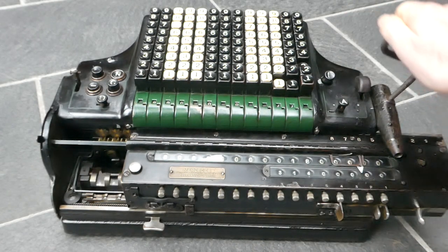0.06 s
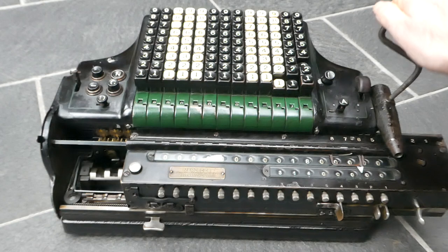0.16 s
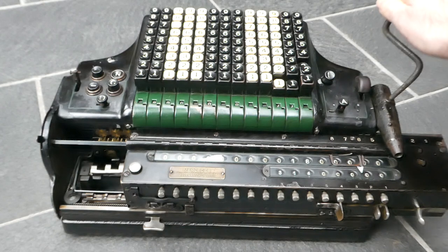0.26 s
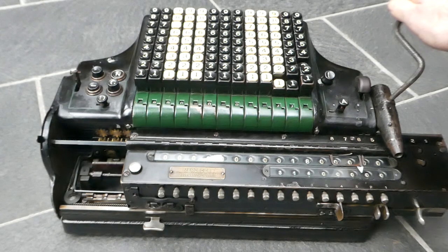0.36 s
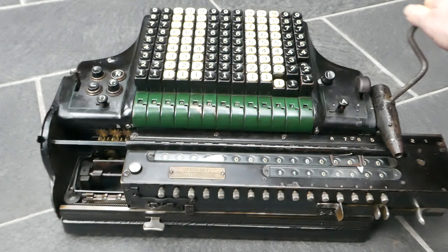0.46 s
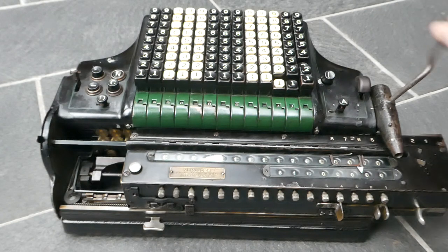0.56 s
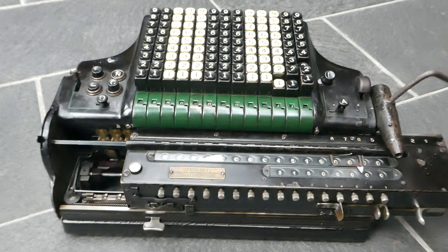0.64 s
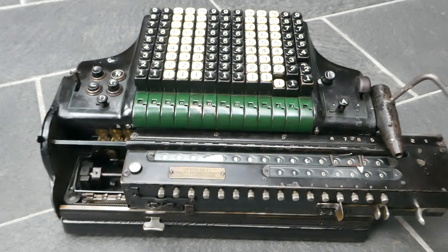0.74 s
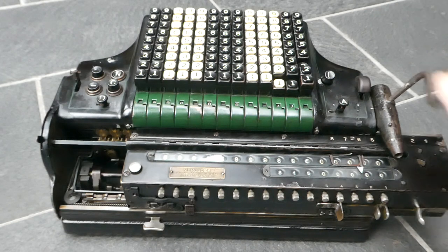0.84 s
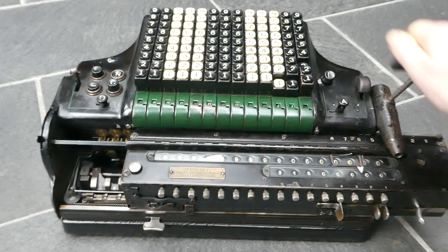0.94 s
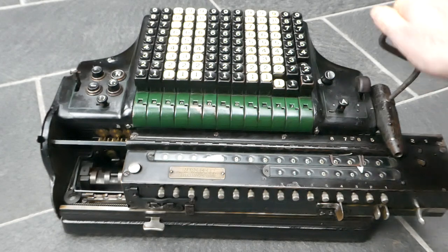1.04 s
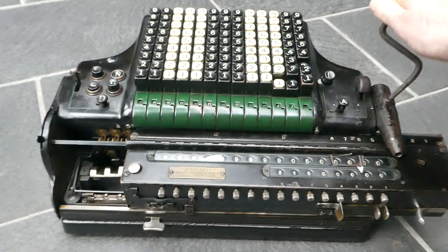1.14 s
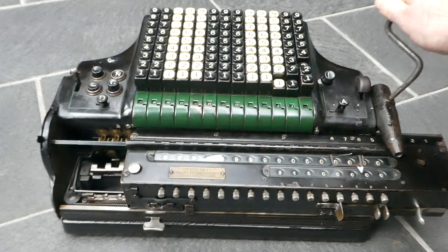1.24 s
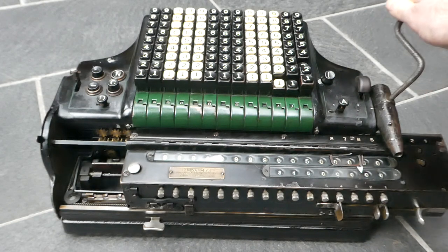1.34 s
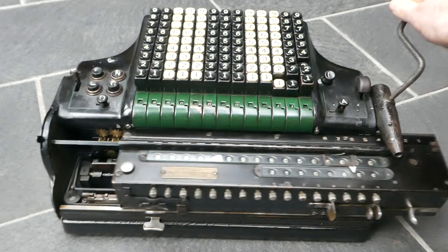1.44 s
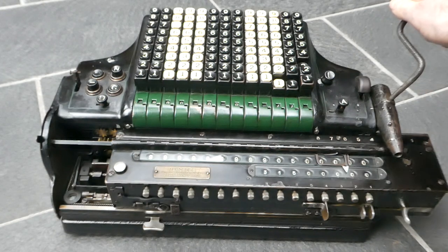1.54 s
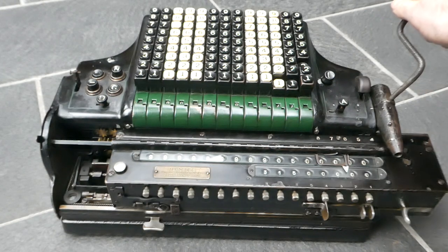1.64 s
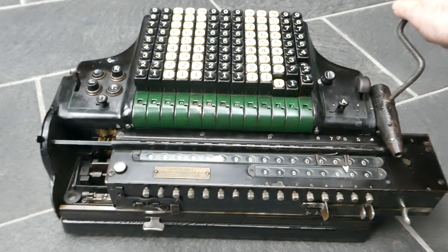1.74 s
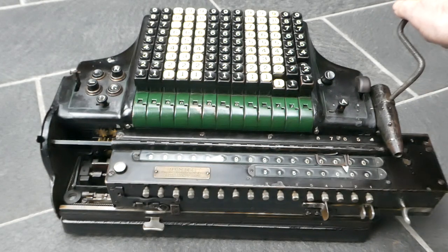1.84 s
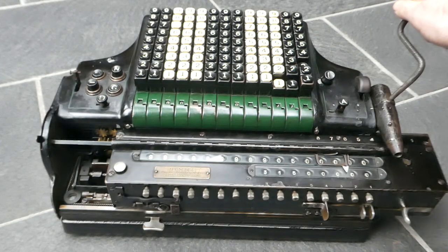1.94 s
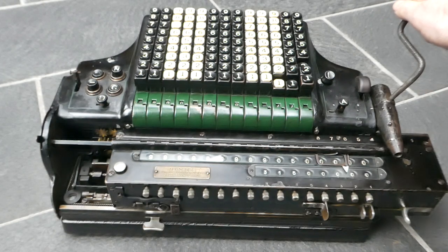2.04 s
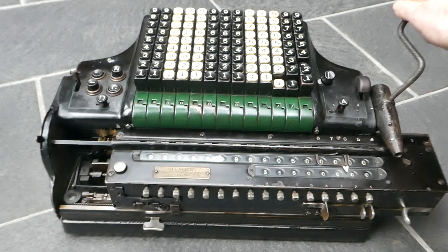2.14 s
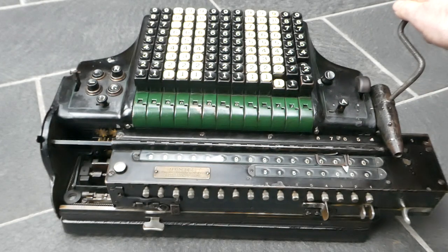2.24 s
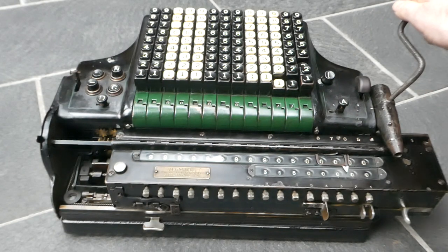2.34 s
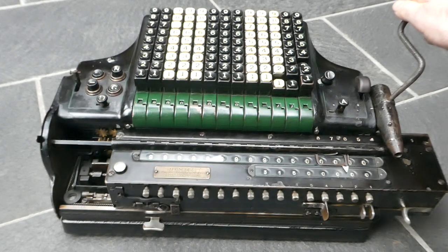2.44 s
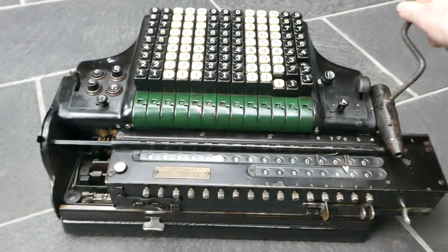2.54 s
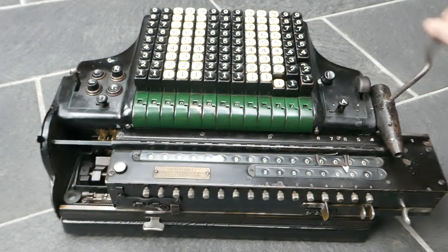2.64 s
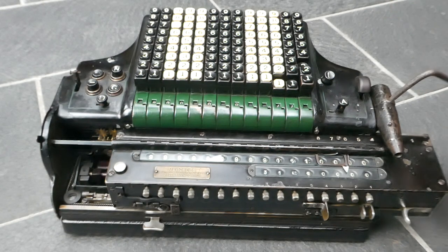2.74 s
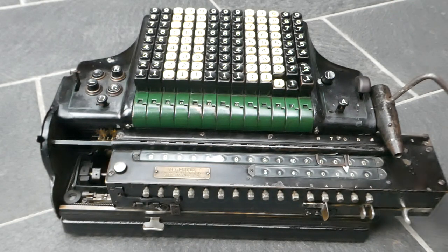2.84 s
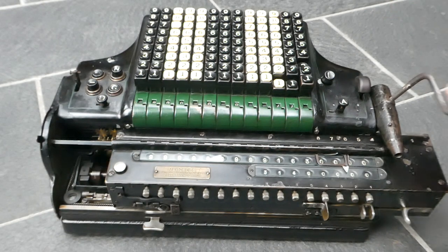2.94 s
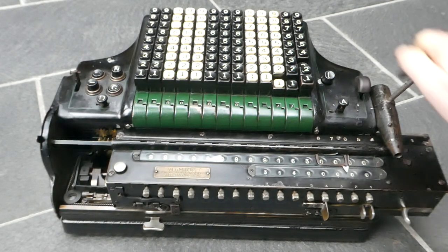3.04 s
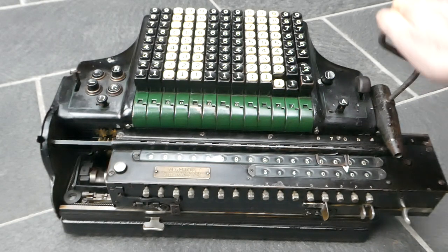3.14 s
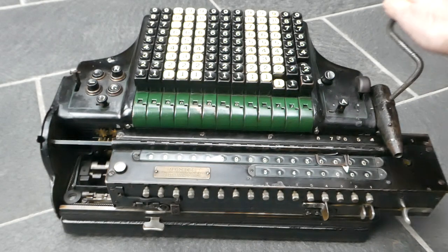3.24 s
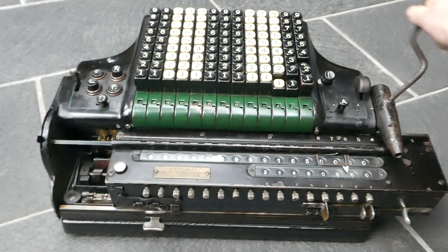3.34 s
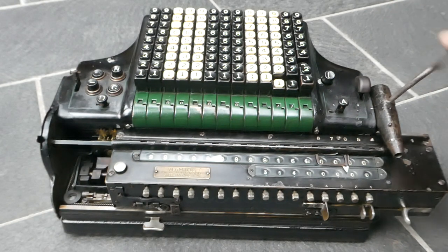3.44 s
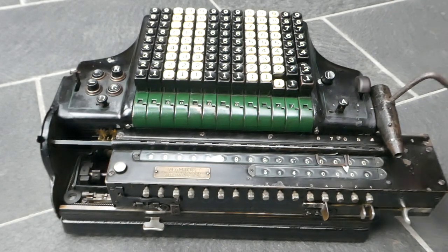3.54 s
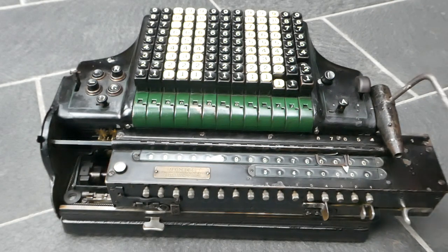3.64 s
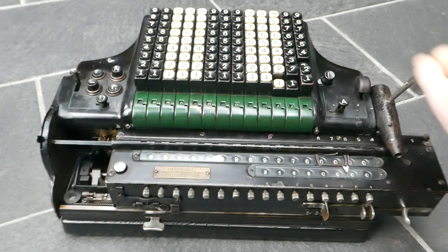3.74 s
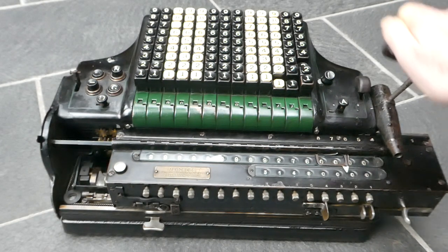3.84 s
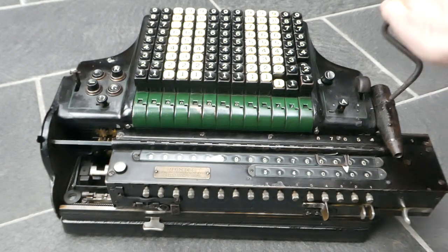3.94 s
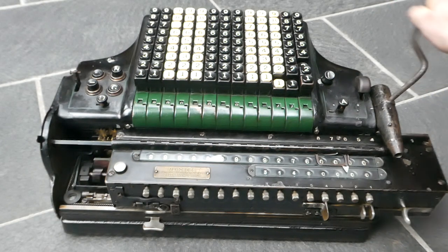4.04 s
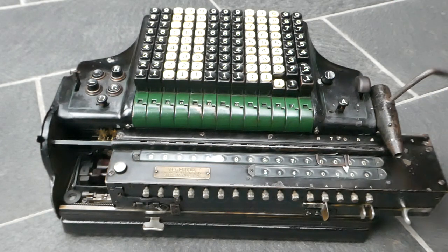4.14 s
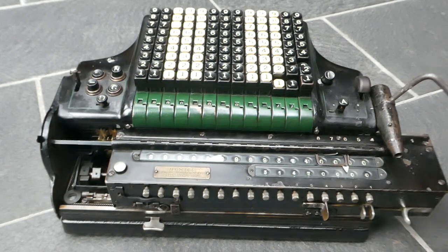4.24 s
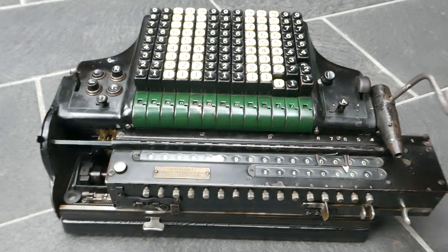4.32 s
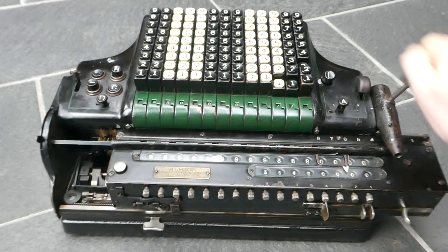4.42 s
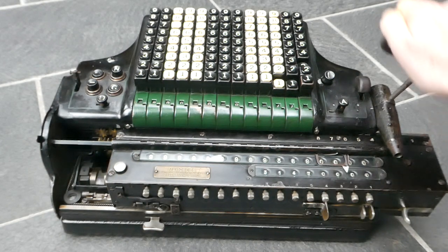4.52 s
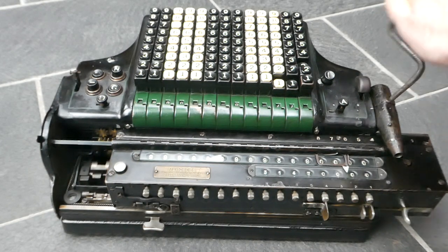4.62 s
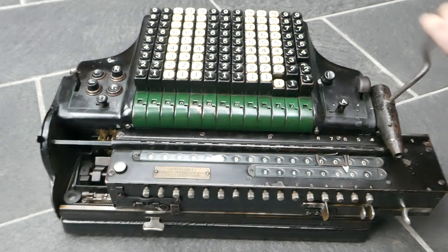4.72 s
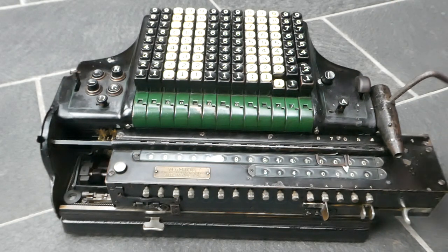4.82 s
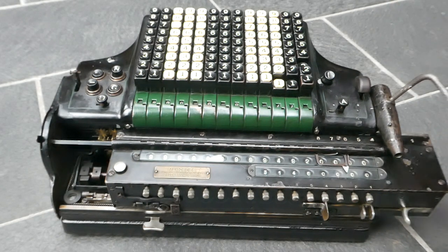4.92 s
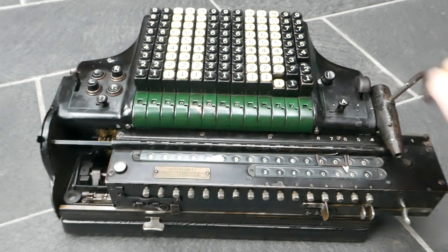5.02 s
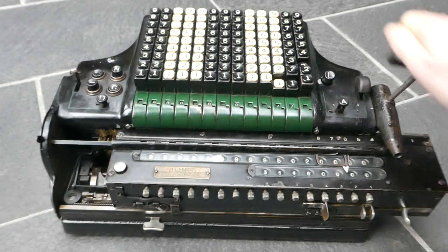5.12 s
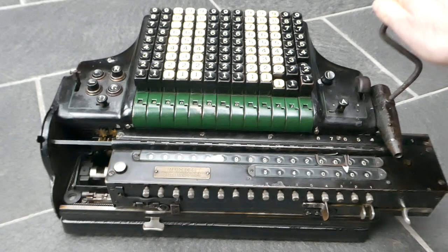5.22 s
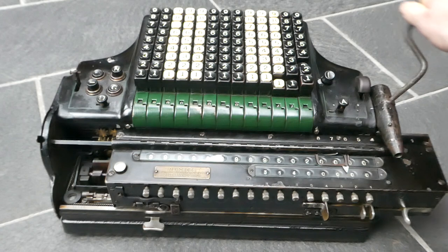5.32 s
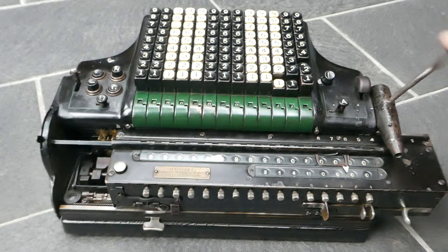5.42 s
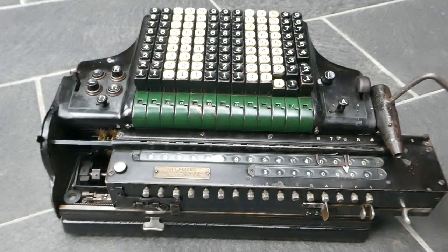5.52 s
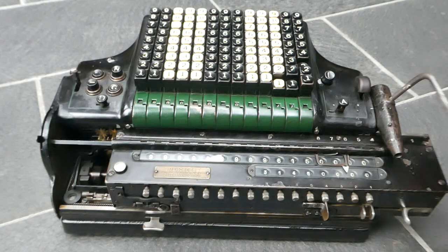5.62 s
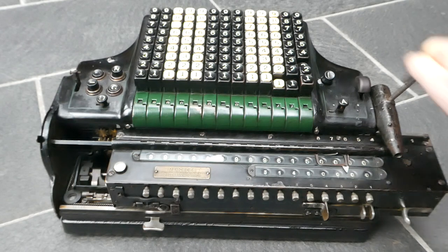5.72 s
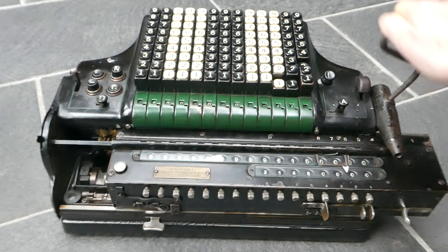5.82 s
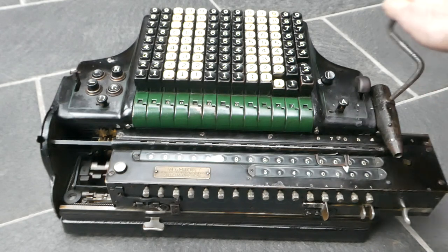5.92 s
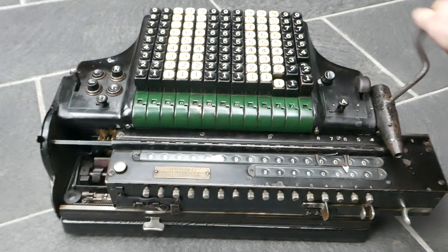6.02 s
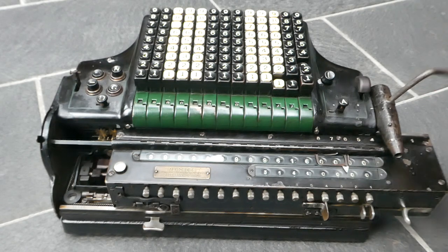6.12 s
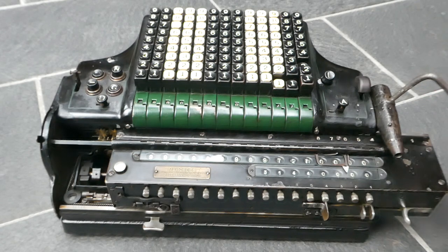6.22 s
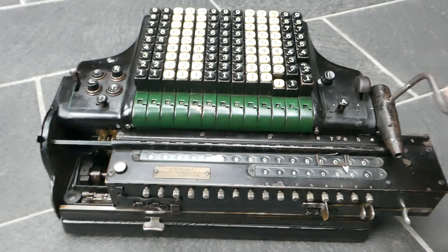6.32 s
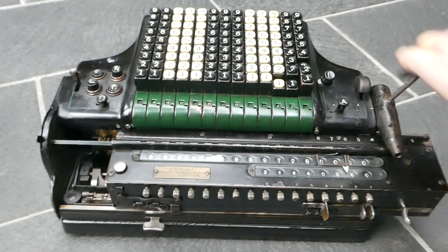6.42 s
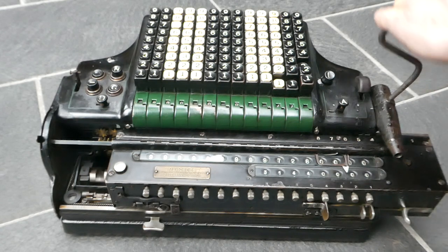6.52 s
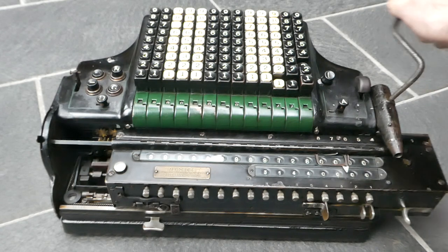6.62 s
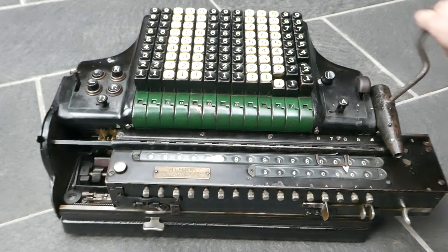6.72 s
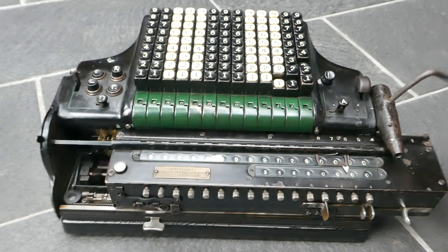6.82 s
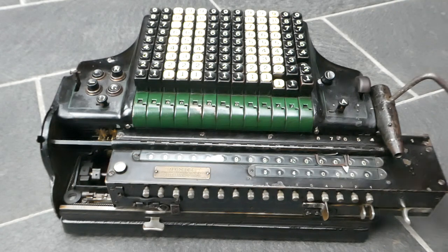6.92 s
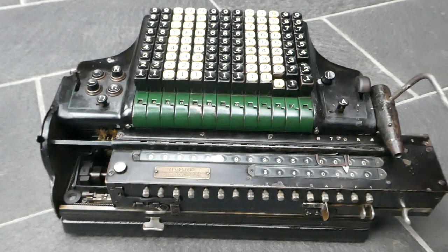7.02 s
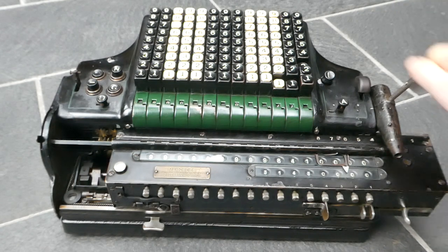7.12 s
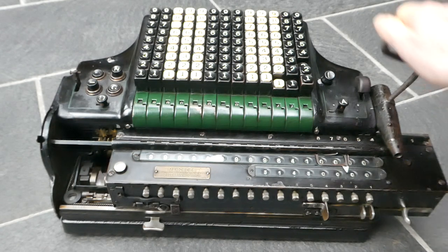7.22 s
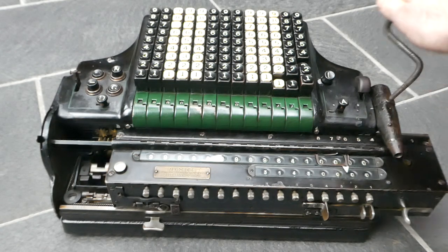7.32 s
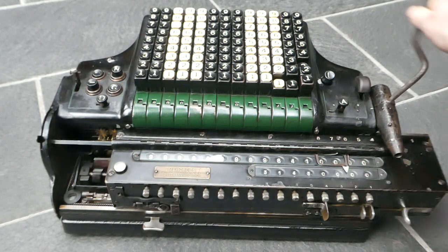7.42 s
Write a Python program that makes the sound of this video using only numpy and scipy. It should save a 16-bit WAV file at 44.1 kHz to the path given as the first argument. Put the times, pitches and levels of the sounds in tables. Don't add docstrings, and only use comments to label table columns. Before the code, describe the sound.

A hand-cranked metal calculator rattles, zips its carriage back, rests with a faint creak, then cranks steadily, each turn ending in a hard clunk.

```python
import sys
import numpy as np
from scipy import signal
from scipy.fft import rfft, irfft, next_fast_len
from scipy.io import wavfile
from scipy.ndimage import uniform_filter1d

SR = 44100
rng = np.random.default_rng(int(sys.argv[2]) if len(sys.argv) > 2 else 0)


def makeup_ratio(level_db):
    decades = np.asarray(level_db, float) / 20
    return 10 ** decades


def inscribe(sig):
    pcm = np.round(np.clip(np.atleast_2d(sig).T, -1, 1) * 32767)
    wavfile.write(sys.argv[1], SR, pcm.astype(np.int16))


N = 328986

# time in seconds, peak in dB, housing in dB, bright crack in dB,
# linkage peak in dB.
CLUNKS = [(0.411, -4.5, -36, -18, -19), (1.0994, -26, -28, 10.5, -21), (1.2731, -14, -4, -11.5, -32),
          (1.371, -13, -33, -29, -20.5), (1.5495, -26, 11, -21, -20), (2.671, -26, -34, -33, -23),
          (3.3177, 0.5, -20, -28, -16.5), (4.0479, 1, -17.5, -20, -14.5), (4.6957, 1, -31, -21.5, -13.5),
          (5.3444, 2.5, -23, -19, -14), (6.0005, 1, -29, -22.5, -12.5), (6.6774, 1.5, -18, -24, -21),
          (7.411, 0, -19, -31, -15.5)]
# start in seconds, end in seconds, first level in dB, last level in dB,
# body share in dB.
DRIVES = [(0.0, 0.41, -32.5, -62, -5), (0.551, .6, -41, -51, -1.5), (0.598, 0.846, -35.5, -39.5, -2),
          (0.872, 1.095, -33.5, -47.5, -4), (1.087, 1.27, -38.5, -57, -1.5), (3.006, 3.312, -39.5, -43, -6),
          (3.727, 4.03, -41.5, -41, -6), (4.388, 4.683, -43.5, -39, -7), (5.04, 5.333, -38.5, -41.5, -5.5),
          (5.692, 5.972, -42.5, -41, -5.5), (6.375, 6.672, -44.5, -39.5, -5.5),
          (7.108, 7.395, -41.5, -41.5, -5.5)]
# frequency in Hz, width in Hz, level in dB.
HOUSING = [(186, 83, -9), (319.6, 26.6, 1), (356.6, 26, -1.5), (396, 31, -0.5), (459, 66, -3.5),
           (580.5, 69, 1.5), (637.7, 61, 1), (769, 69, -2), (899, 72, -1.5), (1036, 175, -9.5)]
# frequency in Hz, width in Hz, level in dB.
LINKAGE = [(1378, 240, -10), (1525, 84, 5.5), (1614, 550, 0.5), (1939, 66, 6), (2080, 320, -7)]
# frequency in Hz, width in Hz, level in dB.
WHEELS = [(5540, 5700, -3), (6710, 3400, 2), (9020, 2160, -1.5), (10940, 1550, -2), (13400, 1400, -16.5)]
# frequency in Hz, width in Hz, level in dB.
PAWLS = [(2620, 760, -3.5), (2981, 286, 4.5), (3160, 392, 0.5), (4040, 510, -1), (4560, 1220, -7)]
REST_START_S, REST_END_S = 1.95, 2.55
ZIP_START_S, ZIP_END_S = 0.6, 1.08


def unit(x):
    return x / np.sqrt(np.mean(x ** 2) + 1e-20)


def along(points, hz):
    f, v = np.transpose(points)
    return np.interp(np.log(hz + 1), np.log(f + 1), v)


def filtered(x, response):
    m = next_fast_len(N + SR // 2)
    spectrum = rfft(x, m) * response(np.fft.rfftfreq(m, 1 / SR))
    return irfft(spectrum, m)[..., :N]


def resonate(x, peaks):
    def body(f):
        total = 0
        for k, (centre, width, db) in enumerate(peaks):
            sign = (-1) ** k
            total = total + sign * makeup_ratio(db) * 1j * f * width / (centre * centre - f * f + 1j * f * width)
        return total

    norm = np.sqrt(np.mean(np.abs(body(np.arange(1, SR / 2))) ** 2))
    return filtered(x, body) / norm


def place(sounds, times):
    at = np.round(np.asarray(times) * SR).astype(int)[:, None] + np.arange(sounds.shape[1])
    return np.bincount(at.ravel(), sounds.ravel(), N + SR)[:N]


def bursts(times, levels_db, rise, t60, size=SR // 20):
    t = np.arange(size) / SR
    shape = (1 - np.exp(-t / rise)) * makeup_ratio(-60 * t / t60)
    puffs = makeup_ratio(levels_db)[:, None] * shape * rng.standard_normal((len(times), size))
    return place(puffs, times)


def lever():
    # frequency in Hz, level in dB, t60 in seconds.
    modes = [(364, -18.5, 0.076), (583, -17, 0.09), (1680, -1.5, 0.014), (1990, -15, 0.02),
             (2565, -11.5, 0.058), (2990, 0, 0.017), (3150, 8, 0.0085), (3330, -3.5, 0.012),
             (5270, -6.5, 0.012)]
    t = np.arange(SR // 8) / SR
    ring = np.zeros(N + SR)
    s, db, housing_db, bright_db, _ = np.transpose(CLUNKS)
    scatter_db = rng.normal(0, 1.5, (len(s), len(modes)))
    for start, level_db, scatter in zip(s, db, scatter_db):
        tone = sum(makeup_ratio(mode_db + d - 60 * t / t60) * np.sin(2 * np.pi * hz * t)
                   for (hz, mode_db, t60), d in zip(modes, scatter))
        ring[round(start * SR):][:len(t)] += makeup_ratio(level_db - 13.0) * tone * (1 - np.exp(-t / 0.00086))
    thump = resonate(bursts(s, db + housing_db + 0.5, rise=0.0037, t60=0.039), HOUSING)
    crack = resonate(bursts(s, db + bright_db - 0.5, rise=0.000086, t60=0.0061), WHEELS)
    return ring[:N] + thump + crack


def knocks():
    # time in seconds, peak in dB, housing in dB.
    between = [(0.4367, -19.5, -5), (0.613, -42, -20), (2.582, -40, -6), (2.7106, -13, -10),
               (2.8749, -22, -9), (3.35, -19, 2), (3.477, -19, -18), (3.495, -24, -13), (4.11, -18, -9),
               (4.149, -18, -20), (4.165, -22.5, -29), (4.7601, -21, -19), (4.7932, -23, -1),
               (4.81, -17, -6), (5.4152, -20, -26), (5.457, -20, -20), (5.476, -20.5, -24),
               (6.033, -32, -23), (6.08, -19, -20), (6.129, -20, -18), (6.781, -22.5, -23),
               (6.827, -16.5, -7.5), (6.846, -24, -15), (6.87, -18, -17), (7.1374, -21.5, -14)]
    blows = [(s + 0.00089, db, -12) for s, *_, db in CLUNKS]
    slack = [(s - 0.018, db - 14, housing_db) for s, db, housing_db in blows
             if not ZIP_START_S < s < REST_START_S]
    return np.transpose(between + blows + slack)


def linkage():
    s, db, housing_db = knocks()
    bars = resonate(bursts(s, db - 5.5, rise=0.0011, t60=0.041), LINKAGE)
    return bars + resonate(bursts(s, db + housing_db - 2.0, rise=0.0041, t60=0.042), HOUSING)


def ticks():
    # time in seconds, peak in dB, pawl in dB. Wheels coast to a stop.
    coasting = [(0.0873, -16.5, -6), (0.1658, -27, -6), (0.1896, -27, -6), (0.2171, -29.5, -8),
                (0.243, -36, -1), (0.2699, -32, -6), (0.3, -33, -1)]
    clearing = [(0.0144, -25, -7), (0.039, -20.5, -16.5), (0.064, -26, -3), (0.115, -31.5, -3.5),
                (0.329, -37, -3), (0.341, -36, -3), (0.3526, -45, 5), (0.434, -27, 1.5),
                (0.6112, -10.5, -10.5), (0.6386, -14, -8.5), (0.6637, -16.5, -7), (0.6857, -14.5, -11),
                (0.716, -14.5, -14), (0.7375, -14, -9.5), (0.765, -14, -17), (0.7922, -15.5, -14),
                (0.8296, -17, -26), (0.883, -48, -11), (0.8998, -17, -6), (1.0164, -22, -11),
                (1.056, -28, -13), (1.098, -13.5, -14), (1.2492, -45, -4), (1.2735, -31, -8),
                (1.3085, -39, -3), (1.3702, -27, 2.5), (1.438, -33, -13), (1.5422, -36, -2),
                (1.5449, -27, -1), (1.5509, -11.5, -15), (1.556, -25, 0), (1.5645, -30, -12)]
    pawl_drops = [
        (2.5792, -47.5, 9),
        (2.5947, -54, -4),
        (2.6692, -45, 15),
        (6.408, -39.5, 9),
        (6.543, -38, -2),
        (6.779, -48, 12),
    ]
    counting = [(3.004, -40, -14), (3.0211, -37, -4), (3.0326, -22, 0), (3.0435, -19, -5),
                (3.1098, -29, -13), (3.12, -29, -7), (3.1377, -17.5, -14), (3.15, -17, -11),
                (3.1915, -17, -10), (3.209, -19, -9), (3.2439, -21, -12), (3.256, -29, -13),
                (3.2697, -31, -2), (3.2865, -30, 3), (3.2967, -32, 3), (3.7273, -37, -12), (3.758, -26, -1),
                (3.7814, -28, -10), (3.797, -26, -10), (3.811, -20.5, -18), (3.8538, -19, -17),
                (3.8709, -19, -3), (3.8833, -18, -15), (3.9006, -21, -7), (3.9585, -19, -12),
                (3.97, -25, -13), (3.982, -22, -19), (3.9945, -23, -13), (4.008, -25, -3), (4.0275, -24, 2),
                (4.3898, -38, -9), (4.4041, -27, -8), (4.4193, -21.5, -5), (4.439, -22, -16),
                (4.454, -23, -11), (4.4658, -21, -20), (4.51, -23, -21), (4.5297, -17, -11),
                (4.5446, -24.5, 1), (4.5882, -17, -11), (4.623, -24, -9), (4.636, -27, -10),
                (4.6487, -24, -10), (4.6593, -27, -10), (4.67, -24, 0.5), (5.0644, -20, 1),
                (5.0855, -19, -4), (5.1197, -25, -13), (5.131, -32, -11), (5.161, -18, -19),
                (5.177, -18, -18), (5.1887, -15, -12), (5.2311, -24, -4), (5.2567, -27, -9),
                (5.2675, -22, -14), (5.2822, -25, -9), (5.292, -26, -2), (5.304, -25, -1), (5.317, -23, 1),
                (5.3267, -31, -1),
                (5.7101, -27, -9), (5.7227, -23, -1), (5.735, -33, -10), (5.745, -21, -16),
                     (5.7576, -24, -19), (5.7703, -29, -11), (5.7833, -22, -15), (5.8142, -19, -16),
                     (5.8313, -13.5, -13), (5.8879, -20, -8), (5.8976, -18, -9), (5.9094, -19.5, -7),
                     (5.921, -17, -12), (5.932, -28, -3), (5.944, -28, -12), (5.956, -39, -9),
                     (5.98, -27, 2), (6.3946, -25.5, -16), (6.4065, -33, -9), (6.4195, -35, -9),
                     (6.4275, -27, -18), (6.4428, -20, -20), (6.4559, -31, -9), (6.4689, -24, -12),
                     (6.5, -19, -11), (6.5159, -13, -12), (6.5273, -18, -12), (6.5422, -20, -4),
                     (6.5752, -15.5, -10), (6.5971, -20, -12), (6.6099, -27, -13), (6.6211, -42, -10),
                     (6.6354, -37, -9), (6.6583, -27, 0), (7.11, -55, -10), (7.1353, -14, -11),
                     (7.1504, -15, -18), (7.173, -29, -17), (7.185, -23, -9), (7.2233, -21, -12),
                     (7.2317, -19, -16), (7.2477, -13.5, -16), (7.258, -17, -12), (7.277, -21, -16),
                     (7.298, -18.5, -7), (7.3183, -18, -8), (7.3447, -23, -3), (7.3553, -24, -5),
                     (7.3684, -35, 3), (7.3816, -26, -4), (7.3913, -31, 2)]
    answers = [(3.3463, -19, -5.5), (4.069, -27, -1), (4.7197, -23, 1), (5.3717, -25, 3),
               (6.0289, -23.5, 3.5), (6.7096, -21, -3), (7.44, -20.5, -2)]
    # time in seconds, peak in dB.
    tens_carried = [(2.6477, -43), (2.706, -29), (2.741, -22), (2.802, -29), (2.8424, -28), (2.8547, -33),
                    (2.878, -24), (2.9057, -22.5), (2.9422, -23.5), (3.4775, -23.5), (3.4936, -25),
                    (3.5146, -25), (3.545, -26), (3.5861, -25.5), (3.616, -25.5), (3.639, -24),
                    (3.67, -25), (4.147, -25.5), (4.185, -24.5), (4.2135, -24), (4.2462, -29),
                    (4.2555, -28), (4.271, -26.5), (4.2998, -26.5), (4.3262, -24),
                    (4.7938, -23), (4.8302, -29), (4.8417, -23.5), (4.863, -28.5), (4.893, -26),
                    (4.929, -26.5), (4.946, -29), (4.97, -28), (5.4573, -26), (5.498, -21.5),
                    (5.5476, -25.5), (5.58, -27.5), (5.591, -28), (5.634, -26.5), (6.126, -25.5),
                    (6.1706, -25), (6.1928, -26), (6.2238, -24.5), (6.2594, -27), (6.2814, -28.5),
                    (6.3182, -25.5), (6.8247, -25.5), (6.8433, -23.5), (6.865, -22.5), (6.878, -23),
                    (6.9186, -26.5), (6.9704, -27), (6.992, -28), (7.0213, -27)]
    steps = [(s, db - 7, pawl_db) for s, db, pawl_db in counting]
    rebounds = [(s, db - 4.5, pawl_db) for s, db, pawl_db in answers + coasting]
    carries = [(s, db, -9) for s, db in tens_carried]
    engages = [(s, -66, 0) for s, *_ in DRIVES]
    return np.transpose(clearing + steps + pawl_drops + carries + rebounds + engages)


def pings(s, db):
    # frequency in Hz, relative pitch spread, level in dB, t60 in seconds.
    wheel_rings = [(3280, 0.17, -13, 0.014), (4010, .04, -10, 0.018), (6670, 0.085, -11, .012),
                   (9350, 0.049, -11.5, 0.0067), (10670, 0.039, -18, 0.011)]
    t = np.arange(SR // 40) / SR
    rings = np.zeros((len(s), len(t)))
    chance = rng.standard_normal((len(s), len(wheel_rings), 2))
    for k, (hz, spread, level_db, t60) in enumerate(wheel_rings):
        pitch_hz = hz * (1 + spread * chance[:, k, :1])
        size_db = level_db + 7.2 * chance[:, k, 1:]
        envelope = makeup_ratio(db[:, None] + size_db - 60 * t / t60) * (1 - np.exp(-t / 0.0017))
        rings += envelope * np.sin(2 * np.pi * pitch_hz * t)
    return place(rings, s)


def wheels():
    s, db, pawl_db = ticks()
    drag = (s > ZIP_START_S) & (s < ZIP_END_S)
    step = ~drag
    bright = bursts(s[step], db[step] + 0.24, rise=0.002, t60=0.026)
    bright += bursts(s[drag], db[drag] - 0.8, rise=0.0055, t60=0.042)
    low_db = db + pawl_db
    dull = bursts(s[step], low_db[step] - 0.4, rise=0.00088, t60=0.06)
    dull += bursts(s[drag], low_db[drag] + 0.7, rise=0.011, t60=0.13)
    return resonate(bright, WHEELS) + resonate(dull, PAWLS) + pings(s, db)


def strokes(rows, part_db, fall, body, bend, rise):
    power, t = np.zeros(N), np.arange(N) / SR
    release_s = 0.021
    for start, end, first_db, last_db, body_db in rows:
        a, b = round(start * SR), round(end * SR) + SR // 10
        u = t[a:b] - start
        glide = np.clip(u / (end - start), 0, 1) ** bend
        db = first_db + fall * (last_db - first_db) * glide + part_db + body * body_db
        let_go = np.exp(-np.maximum(t[a:b] - end, 0) / release_s)
        power[a:b] += (makeup_ratio(db) * (1 - np.exp(-u / rise)) * let_go) ** 2
    return power


def effort(column):
    # start in seconds, end in seconds, first level in dB,
    # last level in dB, body share in dB.
    shudders = [(.412, .6, -33, -50, 2), (1.273, 1.367, -41, -49.5, 1.5), (1.371, 1.545, -34, -46, 0.5),
                (1.55, 1.95, -49, -77, 13), (2.578, 2.666, -46, -60.5, 0.5), (2.669, 3.0, -42.5, -46, -1.5),
                (3.318, 3.725, -34.5, -47, -0.5), (4.048, 4.385, -29, -46.5, -1.5),
                (4.696, 5.033, -29, -45, -1.5), (5.345, 5.692, -30.5, -44.5, -2),
                (6.0, 6.375, -30, -45.5, -1.5), (6.678, 7.105, -30.5, -50.5, 0.5),
                (7.412, 7.6, -30, -42, -2)]
    # teeth, pawls, linkage, housing in dB.
    drive_db = (1.5, 3, 2.5, 0)
    # teeth, pawls, linkage, housing in dB.
    shudder_db = (-25, -3.5, -2.5, 0)
    body = ((0, 0.04, 0.85, 1.21), (0, 0.078, 0.058, 1.79))
    shudder_fall = (0.24, 1.1, 1.13, 1.24)
    k = column - 1
    drive = strokes(DRIVES, drive_db[k], 0.98, body[0][k], bend=0.71, rise=0.0043)
    shudder = strokes(shudders, shudder_db[k], shudder_fall[k], body[1][k], bend=0.77, rise=0.0022)
    return np.sqrt(drive + shudder)


def stray(rate):
    return rng.random(N) < rate / SR


def meshing():
    # time in seconds, interval between teeth in seconds.
    tooth_interval = [(3.2, .0134), (3.9, .014), (4.5, .0152), (5.2, .0133), (5.85, .0116), (6.5, .0123),
                      (7.3, .0125)]
    s = np.unique(ticks()[0])
    passed = np.diff(s, prepend=0) / np.interp(s, *np.transpose(tooth_interval))
    tooth = np.cumsum(np.maximum(np.round(passed), 1))
    times = np.interp(np.arange(tooth[-1]), tooth, s)
    return np.bincount((times * SR).astype(int), minlength=N)[:N]


def rattle(contacts, scatter_db, t60, smooth):
    hits = contacts * makeup_ratio(scatter_db * rng.standard_normal(N))
    gate = signal.lfilter([1], [1, -makeup_ratio(-60 / (t60 * SR))], hits)
    gate[round(1.6 * SR):round(REST_END_S * SR)] = gate.mean()
    return (unit(uniform_filter1d(gate, size=90)) + smooth) * rng.standard_normal(N)


def gears():
    mesh = meshing()
    tooth_rattle = rattle(mesh + 0.25 * stray(rate=120), scatter_db=2, t60=0.026, smooth=0.3)
    pawl_rattle = rattle(mesh + 0.4 * stray(rate=120), scatter_db=2.5, t60=0.024, smooth=0.4)
    link_rattle = rattle(stray(rate=170), scatter_db=3.5, t60=0.042, smooth=1.0)
    housing_rattle = rattle(stray(rate=90), scatter_db=2, t60=0.05, smooth=1.1)
    teeth = effort(column=1) * unit(resonate(tooth_rattle, WHEELS))
    pawls = effort(column=2) * unit(resonate(pawl_rattle, PAWLS))
    links = effort(column=3) * unit(resonate(link_rattle, LINKAGE))
    housing = effort(column=4) * unit(resonate(housing_rattle, HOUSING))
    return teeth + makeup_ratio(-2.5) * pawls + makeup_ratio(-2) * links + makeup_ratio(-0.5) * housing


def squeak():
    # time in seconds, pitch in Hz, level in dB.
    creaks = [
        [(1.98, 5946, -78), (2.01, 6550, -75), (2.046, 6442, -74), (2.098, 7167, -73), (2.132, 7124, -70),
         (2.184, 7660, -69), (2.228, 7079, -67)],
        [(2.232, 7060, -73), (2.272, 7600, -68.5), (2.398, 7930, -66), (2.448, 6850, -73), (2.49, 7040, -74),
         (2.554, 6311, -75), (2.58, 6348, -75)],
    ]
    # multiple of the pitch, level in dB, flicker in dB.
    partials = [(1, 0, 3), (1.23, -11, 5), (1.39, -12, 5)]
    # frequency in Hz, width in Hz, level in dB.
    pin = [(1430, 1200, 3), (3500, 1200, 3), (5400, 1200, -1)]
    s, hz, db = np.transpose(creaks[0] + creaks[1])
    t = np.arange(N) / SR
    drift = uniform_filter1d(rng.standard_normal((4, N)), size=900)
    pitch = uniform_filter1d(np.interp(t, s, hz), size=700) * (1 + 0.003 * unit(drift[3]))
    phase = 2 * np.pi * np.cumsum(pitch) / SR
    tone = sum(makeup_ratio(level_db + flicker_db * unit(d)) * np.sin(multiple * phase)
               for (multiple, level_db, flicker_db), d in zip(partials, drift))
    rub = makeup_ratio(2) * resonate(rng.standard_normal(N), pin)
    return (tone + rub) * makeup_ratio(np.interp(t, s, db, -140, -140) + 4.0)


def room(x):
    # frequency in Hz, t60 in seconds.
    decay = [(150, 0.13), (700, 0.59), (2000, 0.064), (5000, 0.4), (13000, 0.11)]
    # frequency in Hz, level in dB.
    share = [(100, -18), (500, -1.5), (2000, -7.5), (8000, -4), (14000, -5)]
    hz, t, z = signal.stft(rng.standard_normal((2, SR * 2 // 3)), SR, nperseg=256)
    t60 = along(decay, hz)[:, None]
    tail = signal.istft(z * makeup_ratio(-60 * t / t60) / np.sqrt(t60), SR, nperseg=256)[1]
    delayed = np.pad(x, (150, 0))[None]
    wet = signal.fftconvolve(delayed, tail / np.linalg.norm(tail[0]), axes=1)[:, :N]
    return filtered(wet, lambda hz: makeup_ratio(along(share, hz)))


def ring_down():
    # frequency in Hz, t60 in seconds.
    decay = [(1500, 0.62), (4000, 0.74), (7000, 0.57), (10400, 0.55), (14000, 0.24)]
    # frequency in Hz, level in dB per Hz.
    colour = [(900, -14), (1500, -3.5), (3000, -11), (5600, -9.5), (9100, -15), (15500, -20)]
    start_s = 1.535
    noise = rng.standard_normal((2, N)) + 1.9 * rng.standard_normal(N)
    steady = unit(filtered(noise, lambda hz: makeup_ratio(along(colour, hz))))
    hz, t, z = signal.stft(steady, SR, nperseg=256)
    fall_db = 60 * np.maximum(t - start_s, 0) / along(decay, hz)[:, None]
    fade = (t > start_s) * makeup_ratio(-30 - fall_db)
    return signal.istft(z * fade, SR, nperseg=256)[1][:, :N]


def tiles():
    # time in seconds, peak in dB.
    thumps = [(0.1, -53), (0.418, -59), (1.273, -57), (1.397, -41.5), (1.552, -54), (2.56, -55),
              (3.343, -63), (4.055, -60), (4.384, -45), (4.699, -76), (5.379, -64), (6.027, -49),
              (6.691, -63)]
    # frequency in Hz, level in dB per Hz.
    colour = [(25, -27), (60, -63), (85, -0.5), (130, -3.5), (200, -8.5), (500, -42)]
    s, db = np.transpose(thumps)
    hum = makeup_ratio(-43) * np.sqrt(effort(column=4)) * rng.standard_normal(N)
    boom = hum + bursts(s, db, rise=0.0045, t60=0.29, size=SR // 4)
    apart = np.exp(1j * 1.05 * np.array([[1], [-1]]))
    return filtered(boom, lambda hz: makeup_ratio(along(colour, hz) + 31) * apart)


def air():
    # frequency in Hz, level in dB per Hz.
    colour = [(25, -32), (100, -8), (320, -1.5), (700, -11.5), (1100, -9), (3800, -23), (8000, -27),
              (12000, -29), (16000, -40)]
    noise = rng.standard_normal((3, N))
    shared = noise[1:] + 0.084 * noise[0]
    return makeup_ratio(-56.5) * unit(filtered(shared, lambda hz: makeup_ratio(along(colour, hz))))


def scene():
    # frequency in Hz, left minus right in dB.
    lean = [(60, 20), (180, 1), (550, 1.5), (1650, -1), (4970, -1), (15000, 3.5)]
    machine = lever() + linkage() + wheels() + gears() + squeak()
    direct = filtered(machine, lambda hz: makeup_ratio(along(lean, hz) * np.array([[0.5], [-0.5]])))
    return direct + room(machine) + ring_down() + tiles() + air()


def band_limit(x):
    return signal.sosfilt(signal.butter(12, 16500, fs=SR, output="sos"), x)


def record(dry):
    def response(hz):
        hollow_db = -5 * np.exp(-((hz - 8150) / 280) ** 2)
        return (hz < 15750) * makeup_ratio(hollow_db)

    mix = filtered(dry, response)
    return band_limit(mix)


dry = scene()
out = record(dry)
inscribe(out)
```